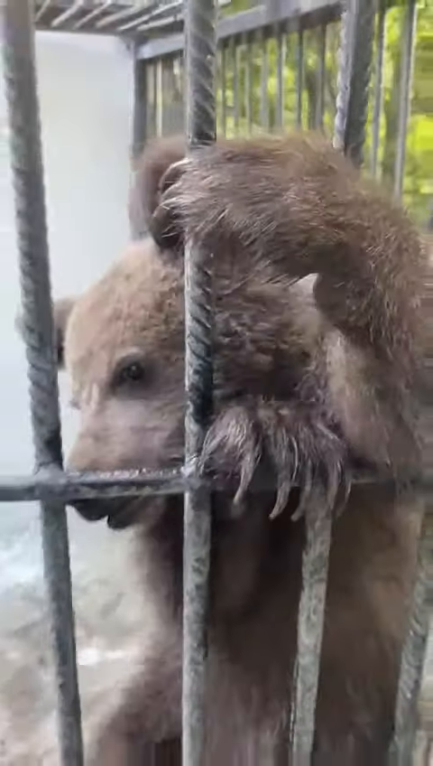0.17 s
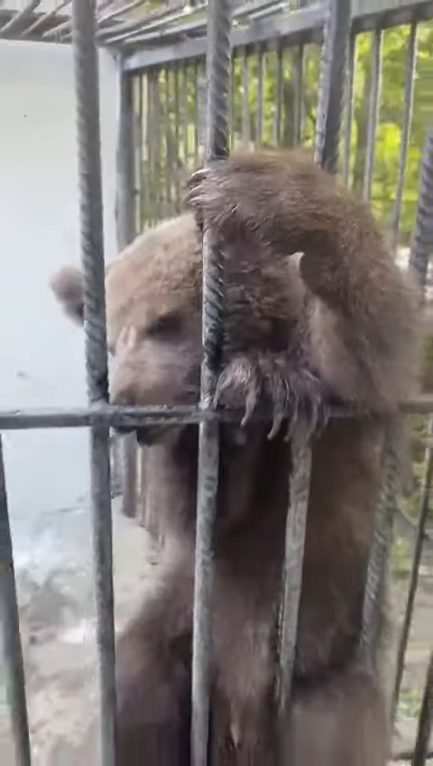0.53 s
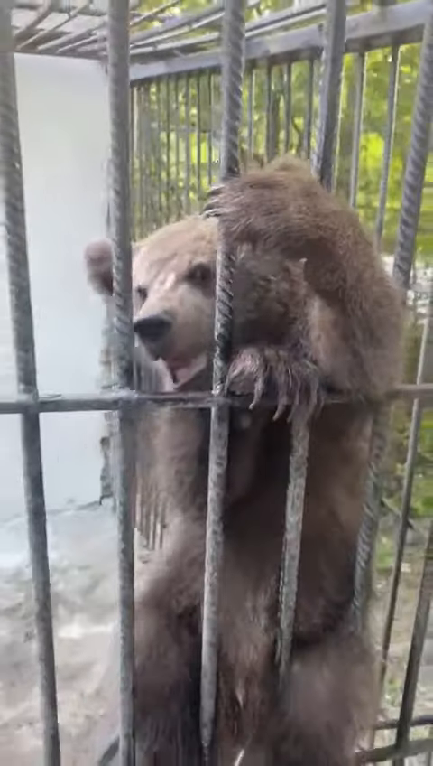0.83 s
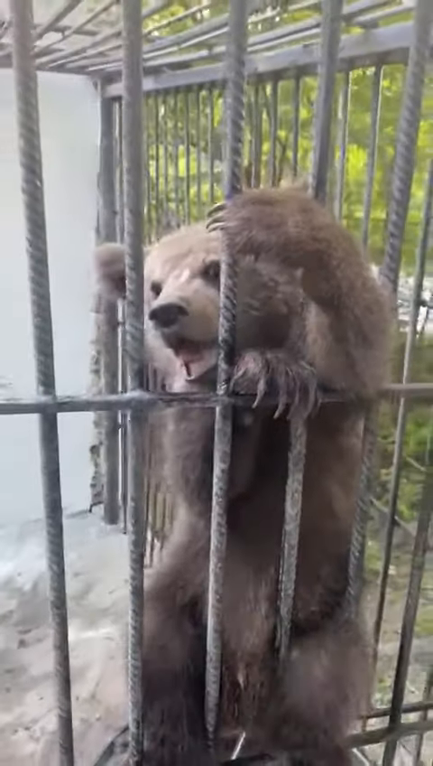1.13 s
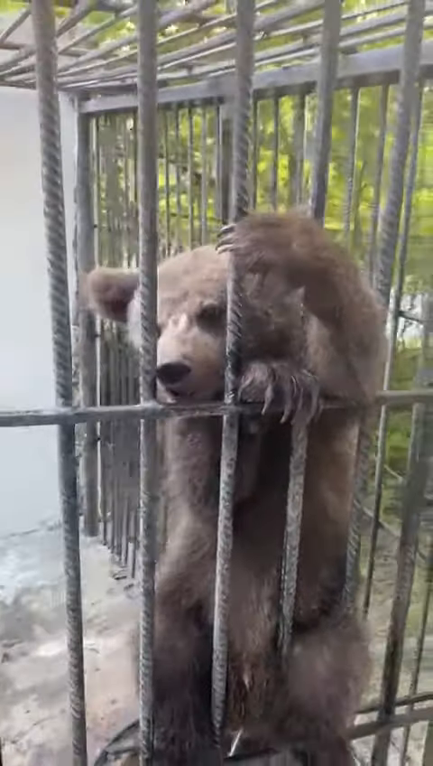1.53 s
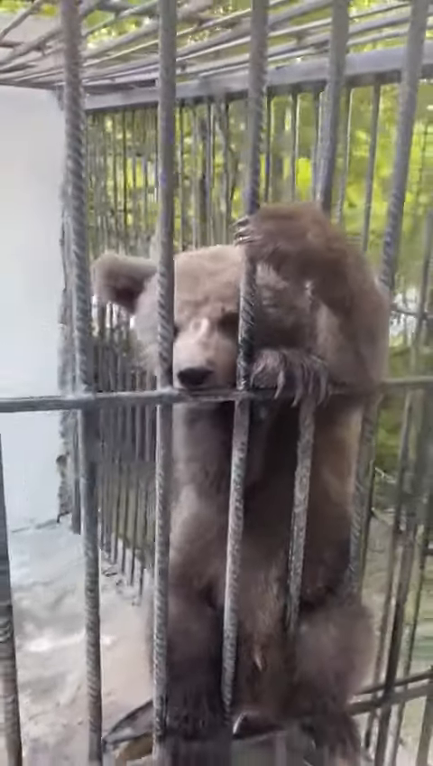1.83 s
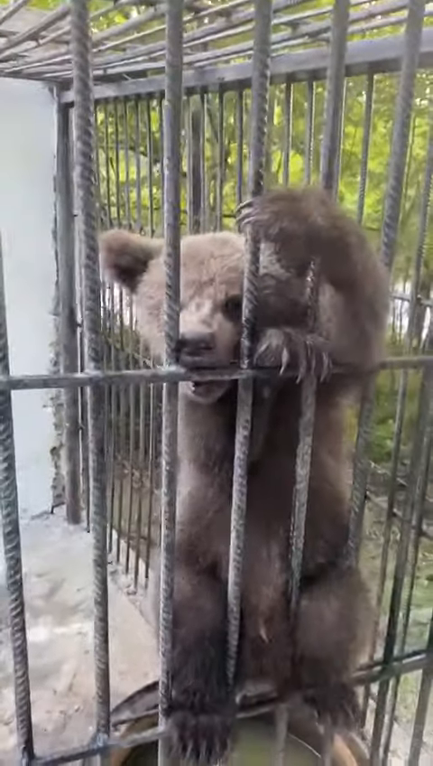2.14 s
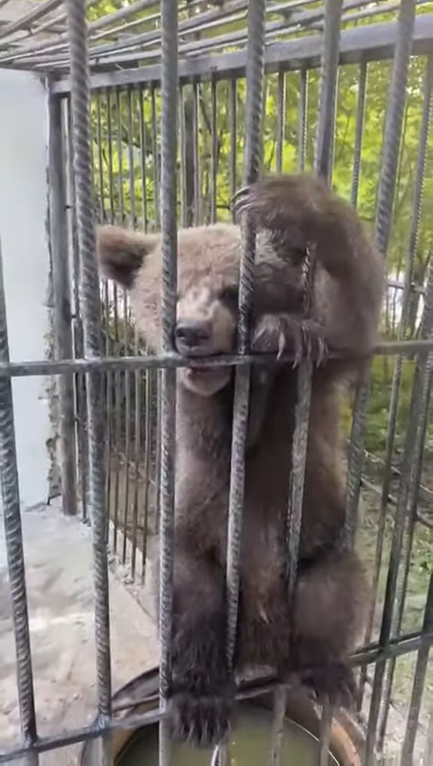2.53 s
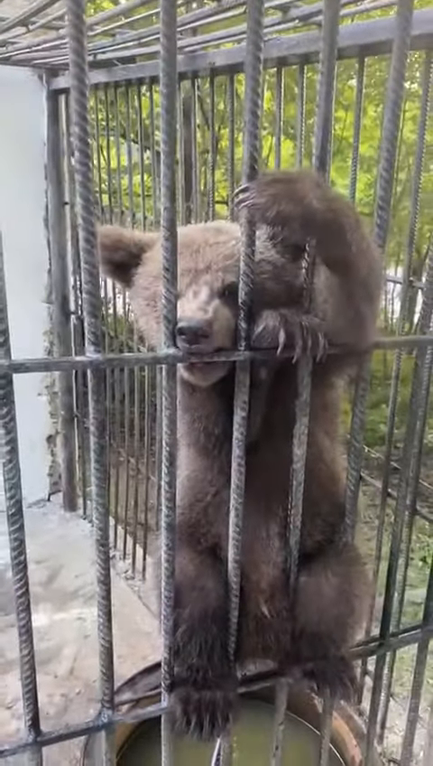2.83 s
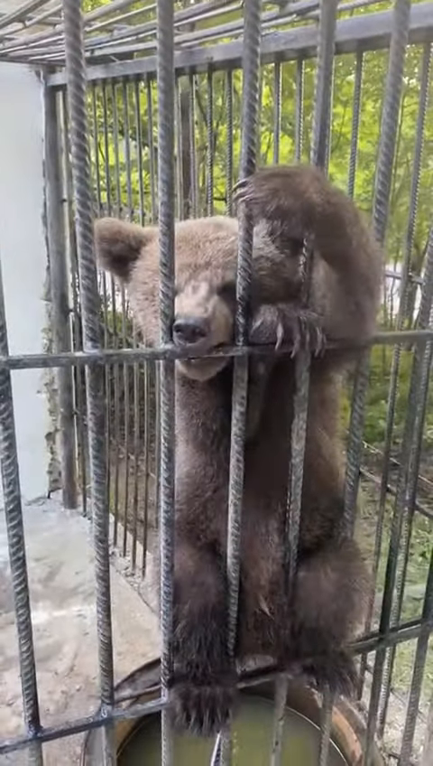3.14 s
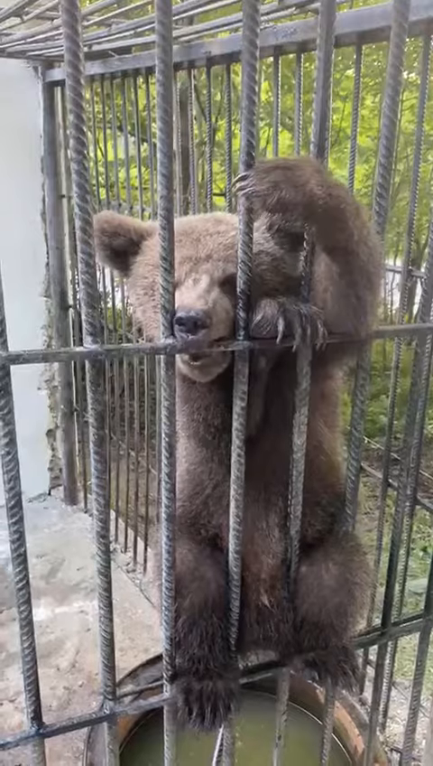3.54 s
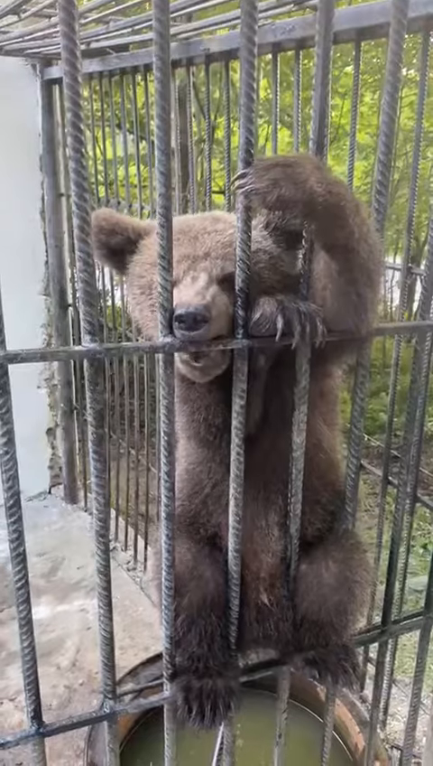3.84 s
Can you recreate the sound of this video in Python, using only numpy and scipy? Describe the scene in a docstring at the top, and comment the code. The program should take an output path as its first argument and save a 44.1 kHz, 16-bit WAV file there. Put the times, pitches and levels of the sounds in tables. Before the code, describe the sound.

Close handheld stereo pickup of a bear cub's harsh bawls: a muffled whine growing into a growling cry, a louder open-mouthed bawl, then another cut off, with nose air, ticks and short concrete reflections outdoors.

```python
"""A bear cub in an outdoor cage bawls three times near a phone. Each call opens with a clean squeal, a stack
of sine overtones, then the voice breaks into slow rough pulses that ring the throat and mouth.
Lip smacks and claw ticks on the bars are short decaying rings, the thin wheeze after the second call is a
fuzzy sine, and nose air is shaped noise. Leaves rustle in stereo over a low rumble that is nearly alike on
both sides, and the concrete wall and floor answer the cub with a short tail of coloured noise."""
import sys
import numpy as np
from scipy import signal
from scipy.fft import rfft, irfft, next_fast_len
from scipy.io import wavfile
from scipy.ndimage import uniform_filter1d, map_coordinates

SR = 44100
rng = np.random.default_rng(int(sys.argv[2]) if len(sys.argv) > 2 else 0)


def persist_wave(psi):
    """Save psi, clipped to +-1, as 16-bit WAV."""
    counts = np.round(np.clip(psi, -1, 1) * 32767).astype(np.int16)
    wavfile.write(sys.argv[1], SR, np.atleast_2d(counts).T)


def undo_db(level):
    """Turn decibels back into plain size, where 20 dB means ten times bigger."""
    steps = np.asarray(level, float) / 20
    return 10 ** steps


N = 176400


def unit(x):
    """Scales to an rms of 1."""
    return x / np.sqrt(np.mean(x ** 2) + 1e-20)


def along(points, hz):
    """Reads (f/Hz, value) points on a log frequency axis."""
    f, v = np.transpose(points)
    return np.interp(np.log(hz + 1), np.log(f + 1), v)


def curves(rows):
    """One value per sample for each column after the time."""
    s, *cols = np.transpose(rows)
    return [np.interp(np.arange(N) / SR, s, c) for c in cols]


def gate(rows, edge_s):
    """1 between the first and last row, with soft edges."""
    t = np.arange(N) / SR
    return np.clip(np.minimum(t - rows[0][0], rows[-1][0] - t) / edge_s, 0, 1)


def wobble(rate):
    """A smooth random curve, rate knots a second."""
    knots = rng.standard_normal(int(N * rate / SR) + 4)
    return map_coordinates(knots, [np.arange(N) * rate / SR])


def filtered(x, response):
    """x through a complex response of frequency."""
    m = next_fast_len(N + SR // 2)
    return irfft(rfft(x, m) * response(np.fft.rfftfreq(m, 1 / SR)), m)[..., :N]


# how alike left and right are: f/Hz, correlation (-1 to 1)
STEREO_LIKENESS = [(60, 0.99), (140, 1), (350, 0.45), (840, 0.42), (2030, 1), (4900, -0.36), (9000, 0.95)]


def rush(spectrum, patchy_db):
    """Stereo noise of rms 1 with patches of random gain in time and frequency."""
    z = signal.stft(rng.standard_normal((2, N)), nperseg=512)[2]
    field = uniform_filter1d(rng.standard_normal(z.shape[1:]), 6, 0)
    field = uniform_filter1d(field, 10, 1)
    pair = signal.istft(z * undo_db(patchy_db * unit(field)), nperseg=512)[1][:, :N]

    def mid_side(hz):
        angle = np.arccos(np.clip(along(STEREO_LIKENESS, hz), -1, 1)) / 2
        return undo_db(along(spectrum, hz)) * np.array([np.cos(angle), np.sin(angle)])

    mid, side = filtered(pair, mid_side)
    return unit(np.array([mid + side, mid - side]))


# strength of the leaves: t/s, level/dB
LEAF_STRENGTH = [(0.0, -62), (0.09, -61), (1.56, -57.5), (2.1, -58.5), (2.9, -61), (3.072, -62.5),
                 (3.43, -61)]
# relative spectrum of the leaves: f/Hz, density/dB per Hz
LEAF_SPECTRUM = [(88, -33), (150, -1.5), (373, -7), (743, 1), (1220, -1), (1670, -7.5), (2800, -12.5),
                 (4030, -17), (5500, -18.5), (7000, -29.5), (12000, -51)]
# relative spectrum of the rumble: f/Hz, density/dB per Hz
RUMBLE_SPECTRUM = [(12, -27), (20, -3), (102, 4), (161, -14.5), (189, -10.5), (300, -3), (660, -120)]
RUMBLE_DB, RUMBLE_SWAY_DB = -64.5, 1.2


def outdoors():
    """Rustling leaves over a low rumble, two noises whose levels sway at random."""
    strength_db, = curves(LEAF_STRENGTH)
    leaves = undo_db(strength_db + wobble(10)) * rush(LEAF_SPECTRUM, patchy_db=1.4)
    rumble_db = RUMBLE_DB + RUMBLE_SWAY_DB * wobble(1.18)
    return leaves + undo_db(rumble_db) * rush(RUMBLE_SPECTRUM, patchy_db=2.0)


# strength of the nose air: t/s, level/dB
NOSE_AIR = [(.18, -73.5), (.25, -54.5), (.42, -61), (.6, -69.5), (1.68, -99), (1.76, -57.5), (1.9, -67.5),
            (2.0, -113), (2.74, -71), (2.79, -48), (2.85, -70.5), (2.93, -125)]
# relative spectrum of the nose air: f/Hz, density/dB per Hz
NOSE_SPECTRUM = [(800, 7), (4000, 1.5), (6500, -7.5), (8500, -4), (11500, -17.5)]


def nose():
    """Air hissing through the cub's nose: coloured noise with a slightly unsteady level."""
    db, = curves(NOSE_AIR)
    hiss = filtered(rng.standard_normal(N), lambda hz: undo_db(along(NOSE_SPECTRUM, hz)))
    return undo_db(db + 1.5 * wobble(24.9)) * unit(hiss)


# clean squeals, one list each: t/s, f/Hz (centre of the pitch), level/dB
SQUEALS = [
    [(0.085, 780, -93), (0.095, 744, -59.5), (0.133, 766, -55), (0.205, 749, -53), (0.21, 640, -29)],
    [(0.212, 580, -34), (0.214, 533, -40.5), (0.224, 501, -51), (0.26, 545, -50), (0.262, 650, -46)],
    [(0.264, 760, -48), (0.276, 780, -54), (0.288, 736, -46)],
    [(0.29, 606, -24), (0.296, 550, -50.5), (0.398, 579, -43.5), (0.41, 663, -48), (0.442, 705, -42.5)],
    [(0.532, 533, -53), (0.54, 565, -44), (0.568, 585, -44), (0.586, 629, -44.5), (0.598, 622.8, -45)],
    [(2.12, 617, -42), (2.14, 558, -35.5), (2.166, 588, -33.5), (2.186, 637, -38), (2.21, 864, -35)],
    [(3.448, 910, -54), (3.456, 905, -36), (3.497, 904, -29.5)],
]
# overtone colour with the mouth shut: f/Hz, level/dB
NASAL_TOPS = [(260, -30), (500, -1), (763, -2.5), (1150, 0.5), (1710, -30), (2300, -3.5), (2800, -3),
              (3060, -12.5), (3500, -8), (4300, -25), (6000, -32), (9000, -45)]
# overtone colour as the mouth opens: f/Hz, level/dB
OPEN_TOPS = [(560, -20), (800, -4), (1170, -5.5), (1760, -0.5), (2300, -16.5), (3000, -24), (3800, -16.5),
             (4600, -35), (5400, -28), (8000, -63)]
# overtone colour with the mouth wide: f/Hz, level/dB
WIDE_TOPS = [(900, 3), (1800, -5.5), (2700, -24), (4500, -38), (5400, -25), (6300, -37), (7200, -38),
             (9000, -69)]
SQUEAL_WAVER, SQUEAL_SHAKE_DB = 0.0075, -21  # pitch waver (share), level shake re the tone
FLICKER_DB = 0.5  # per overtone number


def squeals():
    """Fast regular folds: a stack of overtones coloured by the mouth, with a slightly trembling level."""
    out = np.zeros(N)
    k = np.arange(1, 13)[:, None]  # overtone numbers
    for rows in SQUEALS:
        hz, db = curves(rows)
        on = gate(rows, 0.0084)
        span = np.flatnonzero(on)
        hz = (hz * (1 + SQUEAL_WAVER * wobble(60)))[span]
        start_s = rows[0][0]
        tops = NASAL_TOPS if start_s < 1 else OPEN_TOPS if start_s < 3 else WIDE_TOPS
        flicker_db = FLICKER_DB * k * np.array([wobble(70)[span] for _ in k])
        gains = undo_db(along(tops, k * hz) + 2 * rng.standard_normal(k.shape) + flicker_db)
        shake = 1 + undo_db(SQUEAL_SHAKE_DB) * wobble(400)[span]
        phase = k * 2 * np.pi * np.cumsum(hz) / SR + 6 * rng.random(k.shape)
        tone = (gains * np.sin(phase)).sum(0)
        tone /= np.sqrt((gains ** 2).sum(0) / 2)  # rms 1 whatever the colour
        out[span] += shake * tone * undo_db(db[span]) * on[span]
    return out


def tract(peaks):
    """Steep-sided resonances in parallel (each applied twice), dark between and beyond."""
    def one(f, centre, width):
        return 1j * f * width / (centre * centre - f * f + 1j * f * width)

    def response(f):
        return sum((-1) ** k * undo_db(db) * one(f, c, w) * one(f, c, 3 * w)
                   for k, (c, w, db) in enumerate(peaks))

    return response


# loudness of each rough stretch, one list each: t/s, level/dB
BAWLS = [
    [(0.3, -54.5), (0.374, -46.5), (0.4, -57)],
    [(0.438, -36.5), (0.494, -34), (0.532, -37.5), (0.545, -38)],
    [(0.592, -26), (0.604, -36.5), (0.952, -34.5), (1.05, -29), (1.28, -29.5), (1.3, -26.5), (1.378, -30.5),
     (1.396, -35), (1.412, -52), (1.455, -50.5)],
    [(2.2, -43), (2.212, -28.5), (2.242, -24.5), (2.376, -34.5), (2.462, -28.5), (2.55, -30.5),
     (2.604, -29), (2.63, -32.5), (2.688, -27), (2.728, -27.5), (2.772, -31.5), (2.8, -48), (2.86, -57.5)],
    [(3.49, -27), (3.494, -28.5), (3.6, -32.5), (3.664, -36.5), (3.774, -31), (3.85, -36.5), (3.886, -30),
     (3.892, -27), (4.0, -28)],
]
# the folds and mouth: t/s, f/Hz (centre of the pulse rate), roughness (0-1), every other pulse weaker by/dB,
# mouth (1 shut, 2 half, 3 wide, 4 lips drawn back)
VOICE = [(.3, 110, .9, 0, 2.6), (.4, 80, .8, 0, 2.6), (.43, 62, .36, 0, 1), (.92, 66, .36, 0, 1.1),
         (.97, 120, .6, 4, 1.5), (1.06, 126, .55, 3, 1.9), (1.2, 141, .35, 3, 2), (1.24, 144, .12, 2, 2),
         (1.33, 146, .16, 2, 2.25), (1.37, 163, .12, 1, 2.1), (1.45, 145, .1, 0, 2), (2.2, 128, .2, 0, 3),
         (2.24, 140, .14, 1, 3), (2.29, 140, .25, 2, 3.2), (2.36, 138, .5, 2, 3.1),
         (2.44, 123, .42, 3, 3.2), (2.6, 129, .36, 3, 3.7), (2.69, 133, .22, 2, 4), (2.745, 165, .12, 0, 4),
         (2.79, 158, .1, 0, 4), (2.86, 125, .3, 0, 4), (3.49, 134, .2, 0, 3), (3.56, 136, .3, 2, 3.2),
         (3.61, 86, .4, 0, 3.9), (3.85, 84, .45, 0, 3.2), (3.89, 139, .1, 0, 3), (3.94, 146, .12, 0, 3.3),
         (4, 150, .25, 0, 4)]
# slaps of the folds of set time and size: t/s, level/dB re the usual slap
PLACED_SLAPS = [(0.855, 3), (2.223, 3.5), (2.503, 2), (2.556, 6.5), (2.588, 3), (2.597, 4), (2.619, 3.5),
                (2.643, 0), (2.675, 1.5), (3.59, 3), (3.626, -1.5), (3.688, -5.5), (3.725, -1.5),
                (3.774, 0), (3.788, 3), (3.813, 0.5), (3.891, 1.5)]
# throat and mouth resonances, mouth shut: f/Hz, width/Hz, level/dB
SHUT = [(130, 130, -20.5), (372, 79, 0), (523, 133, -2.5), (795, 63, -5), (1083, 160, -9.5),
        (2524, 240, -3.5), (3710, 780, -17), (5380, 700, -29.5), (6780, 360, -31.5)]
# the same, mouth half open: f/Hz, width/Hz, level/dB
HALF = [(141, 86, -11), (417, 79, 3), (824, 124, 0.5), (1210, 190, -11.5), (1757, 280, -8.5),
        (2254, 207, -7.5), (3070, 390, -12.5), (4240, 500, -18.5), (5580, 370, -27.5), (7400, 660, -30.5),
        (10180, 510, -29.5)]
# the same, mouth wide: f/Hz, width/Hz, level/dB
WIDE = [(134, 75, -16.5), (421, 123, -8.5), (684, 82, -13.5), (901, 81.3, 3.5), (1240, 178, -12),
        (1844, 225, -6), (2930, 363, -20), (4056, 335, -18.5), (5300, 360, -27.5), (7360, 600, -34),
        (9400, 480, -37.5), (10530, 720, -47)]
# the same, mouth closing at a call's end: f/Hz, width/Hz, level/dB
CLOSING = [(174, 28, 2.5), (353, 29, 12.5), (500, 115, -2.5), (870, 66, -1), (1280, 160, -7.5),
           (2550, 720, -10.5)]
# moments the mouth has shut as a call ends: t/s
CLOSES = [1.406, 2.775]
# each slap's bare click through the open mouth: f/Hz, width/Hz, level/dB
SNAP = [(1186, 1100, 0)]
JITTER, SIZE_DB, WANDER = .5, 4, .12  # at full roughness: of a period, dB, share of the rate
STRAYS, STRAY_DB = 5.4, -6  # extra pulses a period at full roughness, their size
BREATH_DB, PUFF_DECAY = 4, 336  # breath at full roughness, its dying rate per second
SOFT_HZ, SOFT_DB = 500, 13  # slaps behind a shut mouth: rounding corner, lift
SHUT_BREATH_DB, SHUT_LEAK = 6, .025  # breath lift and steady noise behind a shut mouth
DRAWN_BACK = 0.045  # rise of two mouth resonances with the lips drawn back (share)
CLOSE_S, FLUTTER_DB, SNAP_DB = 0.045, 1.2, -6.5  # flutter at full roughness, snap at none


def fold_slaps(rate, rough, alternate_db):
    """One pulse per cycle of the folds; roughness scatters its timing and size."""
    turns = np.cumsum(rate) / SR
    at = np.flatnonzero(np.diff(np.floor(turns)) > 0)
    chance = rng.standard_normal((len(at), 2))
    shift = JITTER * rough[at] ** 2 * chance[:, 0] * SR / rate[at]
    moved = np.clip(at + shift, 0, N - 1).astype(int)
    every_other = np.arange(len(at)) % 2
    size = undo_db(SIZE_DB * rough[at] * chance[:, 1] - alternate_db[at] * every_other)
    for s, db in PLACED_SLAPS:
        near = np.argmin(np.abs(moved - s * SR))
        moved[near], size[near] = round(s * SR), undo_db(db)
    return np.bincount(moved, size, N)


def bawls():
    """Slow slaps of the folds; roughness adds strays and breath; all rings the mouth shape."""
    rate, rough, alternate_db, mouth = curves(VOICE)
    rate = rate * (1 + WANDER * rough * wobble(25))
    slaps = fold_slaps(rate, rough, alternate_db)
    stray_here = rng.random(N) < STRAYS * rough ** 2 * rate / SR
    strays = stray_here * rng.standard_normal(N) * undo_db(STRAY_DB)
    fade = np.exp(-PUFF_DECAY / SR)
    puff = signal.lfilter([1], [1, -2 * fade, fade ** 2], slaps)  # swells and dies after each slap
    breath_gain = undo_db(BREATH_DB) * rough ** 0.56 * np.sqrt(rate / SR)
    breath = breath_gain * unit(puff) * rng.standard_normal(N)
    source = slaps + strays + breath
    # evens out the power over a tenth of a second
    steady = 1 / np.sqrt(np.abs(uniform_filter1d(source ** 2, SR // 10)) + 1e-12)

    # behind a shut mouth the slaps are rounded and the treble is breath, partly steady
    rounded = filtered(slaps + strays, lambda f: (1 + 1j * f / SOFT_HZ) ** -4)
    soft = undo_db(SOFT_DB) * rounded + undo_db(SHUT_BREATH_DB) * breath
    soft = soft + SHUT_LEAK * rng.standard_normal(N)
    back = [(c * (1 + DRAWN_BACK * (800 < c < 1000 or 1500 < c < 2100)), w, db) for c, w, db in WIDE]
    shapes = [unit(filtered(steady * soft, tract(SHUT)))]
    shapes += [unit(filtered(steady * source, tract(peaks))) for peaks in (HALF, WIDE, back, CLOSING)]

    t = np.arange(N) / SR
    closed = sum(np.clip(1 + (t - s) / CLOSE_S, 0, 1) * (t < s + .2) for s in CLOSES)
    position = np.clip(mouth, 1, 4)
    shares = [(1 - closed) * np.clip(1 - np.abs(position - k), 0, 1) for k in range(1, 5)] + [closed]
    voice = sum(np.sqrt(share) * shape for share, shape in zip(shares, shapes))
    voice = voice * undo_db(FLUTTER_DB * rough * wobble(45))
    openness = 1 - shares[0] - closed
    snap = unit(filtered(slaps, tract(SNAP)))
    voice = voice + undo_db(SNAP_DB) * openness * (1 - rough) ** 2 * snap
    return voice * sum(gate(rows, 0.0032) * undo_db(curves(rows)[0]) for rows in BAWLS)


# claw ticks: t/s, level/dB (start of the ring), f/Hz, crack brightness/dB (relative)
TICKS = [(0.701, -44, 9700, -3), (0.921, -37.5, 6100, -0.5), (2.019, -39, 2770, -30),
         (2.069, -40, 5300, -0.5), (3.262, -53, 5670, -15), (3.3162, -42, 4070, -9)]
TICK_T60, TICK_CRACK_DB = .008, -2  # s, added to every crack's brightness


def ticks():
    """Claws on the bars: a sine that dies at once, with a bright crack of noise."""
    out, t = np.zeros(N + SR), np.arange(SR // 20) / SR
    for s, db, hz, bright_db in TICKS:
        noise = uniform_filter1d(rng.standard_normal(len(t) + 1), size=3)
        crack = undo_db(TICK_CRACK_DB + bright_db) * np.diff(noise) * 2
        ring = np.sin(2 * np.pi * hz * t)
        out[round(s * SR):][:len(t)] += undo_db(db - 60 * t / TICK_T60) * (ring + crack)
    return out[:N]


# lip smacks, and last the soft onset of the nose air: t/s, level/dB (nominal peak), f/Hz
SMACKS = [(1.498, -39.5, 610), (1.513, -42, 342), (1.731, -53, 695)]
SMACK_CYCLES = 2.15  # the swell peaks after a third of these


def smacks():
    """Lip smacks, and last the soft onset of the nose air: a few cycles of a sine that swell and die."""
    out, t = np.zeros(N + SR), np.arange(SR // 20) / SR
    for s, db, hz in SMACKS:
        u = t * hz / SMACK_CYCLES
        swell = u * 3 * np.exp(-3 * u)
        # 12.5 dB makes up for the low crest of the swell
        out[round(s * SR):][:len(t)] += undo_db(db + 12.5) * swell * np.sin(2 * np.pi * hz * t)
    return out[:N]


# the whistle's path: t/s, f/Hz (centre), level/dB
WHEEZE = [(2.86, 2600, -81), (2.9, 2580, -62), (3.03, 2394, -67), (3.18, 2410, -79)]


def wheeze():
    """A thin whistle after the second call, fuzzed by random level and pitch."""
    hz, db = curves(WHEEZE)
    fuzz = 1 + 0.3 * wobble(130)
    phase = 2 * np.pi * np.cumsum(hz + 22 * wobble(120)) / SR
    return gate(WHEEZE, 0.02296) * undo_db(db) * fuzz * np.sin(phase)


# how long the reflections ring: f/Hz, T60/s
CAGE_T60 = [(200, 0.2), (1500, 0.16), (8000, 0.21)]
# colour of the reflections: f/Hz, level/dB
CAGE_COLOUR = [(120, -41), (300, 1), (900, 5), (1900, -2), (3000, 8), (8000, -1)]


def cage(x):
    """The wall and floor answer briefly, a decaying noise tail different at each microphone."""
    hz, t, z = signal.stft(rng.standard_normal((2, SR // 3)), SR, nperseg=256)
    decay_db = 60 * t / along(CAGE_T60, hz)[:, None]
    shaped = z * undo_db(along(CAGE_COLOUR, hz)[:, None] - decay_db)
    tail = signal.istft(shaped, SR, nperseg=256)[1]
    delayed = np.pad(x, (200, 0))[None]  # samples
    return signal.fftconvolve(delayed, tail / np.linalg.norm(tail[0]), axes=1)[:, :N]


# left over right for the cub: f/Hz, level/dB
LEAN = [(100, 0), (260, 2), (420, 1), (1840, -.5), (3000, -2), (4200, -4.5), (6500, -3), (9000, 0)]
# how far left leads right for the cub: f/Hz, phase/rad
LEAD = [(150, 0), (430, -.4), (1000, -.25), (1900, -.05), (2700, 1), (3400, .3), (4200, .5), (5500, 1.3),
        (8000, 2), (10500, 2.2), (12000, .4)]
CAGE_DB = -12


def scene():
    """The cub reaches two microphones with a colour-dependent lean and lead, amid cage and outdoors."""
    cub = nose() + squeals() + bawls() + ticks() + smacks() + wheeze()

    def two_sides(hz):
        log_gain = along(LEAN, hz) * np.log(10) / 20
        return np.exp(np.outer([.5, -.5], log_gain + 1j * along(LEAD, hz)))

    return filtered(cub[None], two_sides) + undo_db(CAGE_DB) * cage(cub) + outdoors()


def band_limit(x):
    """A steep low-pass at the top of the band."""
    return signal.sosfilt(signal.butter(12, 12000, fs=SR, output="sos"), x)


def record(dry):
    """The phone's microphone port dips the upper treble and its input saturates softly."""
    notch_hz, notch_width_hz, notch_depth = 4857, 1600, 0.37
    ceiling = .3  # of full scale

    def port(f):
        band = 1j * f * notch_width_hz
        return 1 - notch_depth * band / (notch_hz ** 2 - f * f + band)

    x = filtered(dry, port)
    x = x / (1 + np.abs(x / ceiling) ** 4) ** (1 / 4)
    return band_limit(x)


dry = scene()
out = record(dry)
persist_wave(out)
```